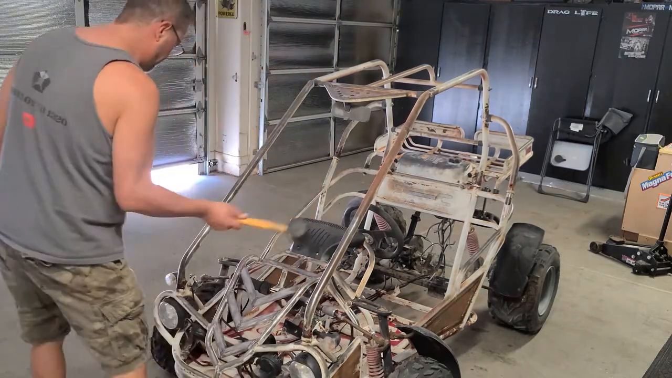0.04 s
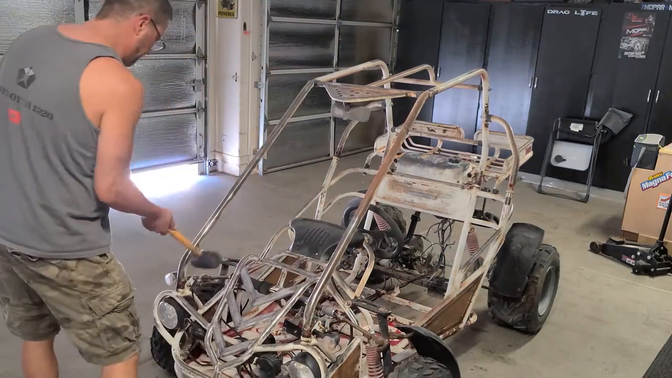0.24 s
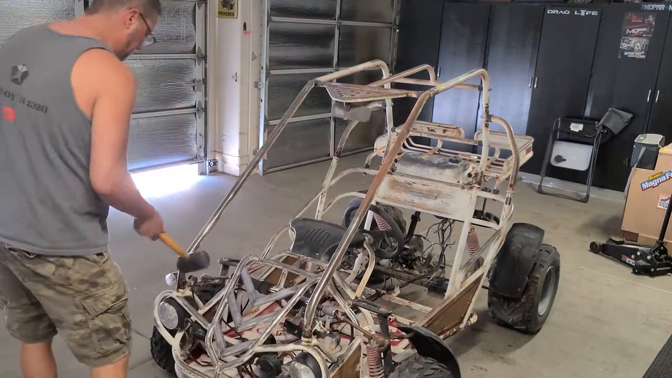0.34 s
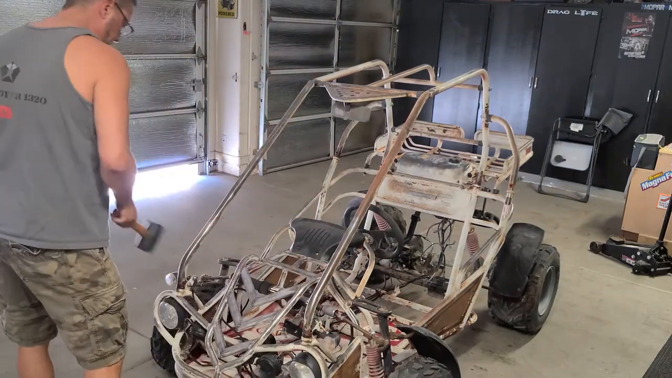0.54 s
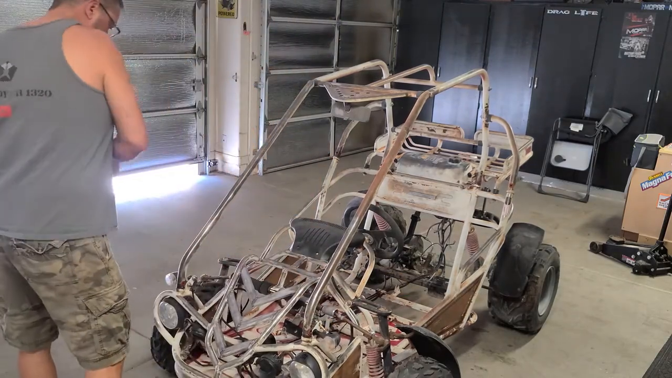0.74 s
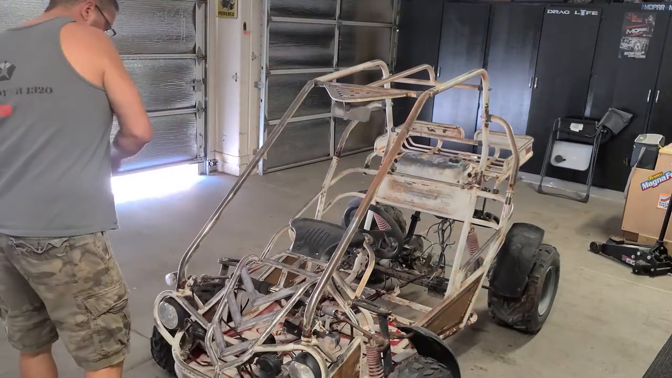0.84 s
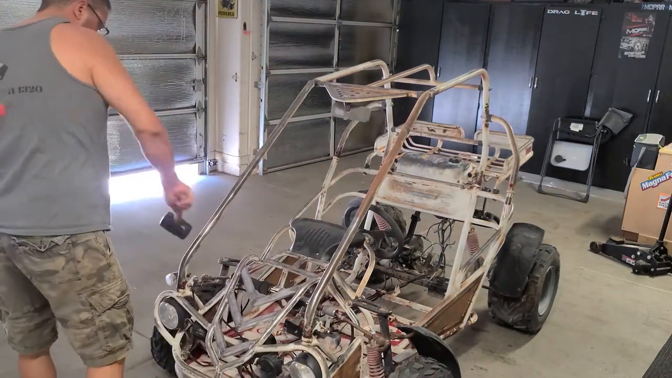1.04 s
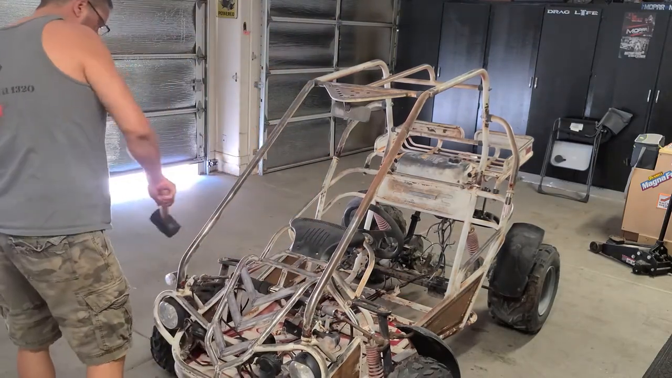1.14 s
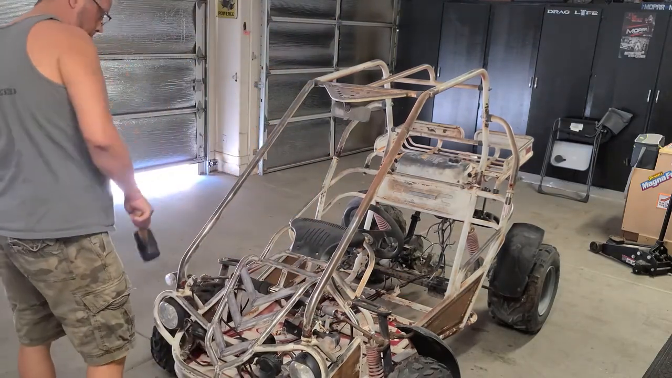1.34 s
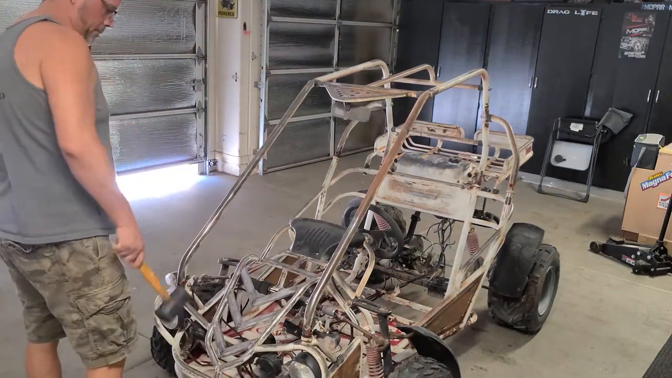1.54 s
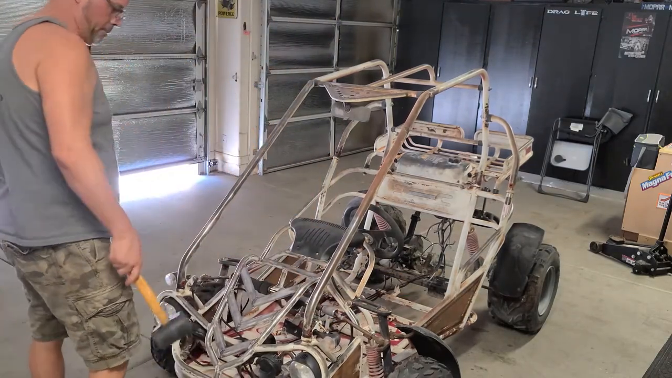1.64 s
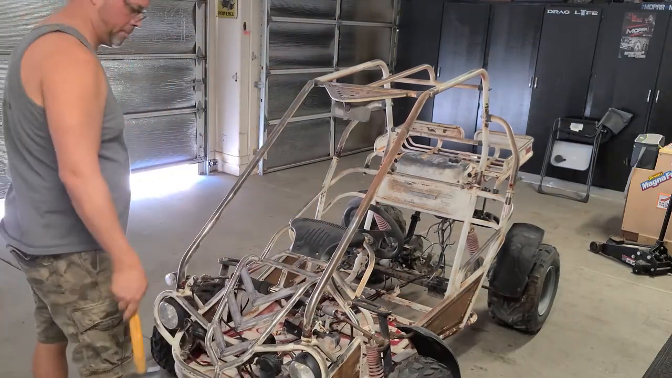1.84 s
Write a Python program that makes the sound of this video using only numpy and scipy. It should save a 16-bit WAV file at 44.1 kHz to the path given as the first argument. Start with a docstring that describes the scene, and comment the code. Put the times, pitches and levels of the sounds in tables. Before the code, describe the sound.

A rubber mallet hits a metal buggy frame, clothing swishing with the swing; the tubes clang, joints rattle and a loose part tinks, then a second blow follows, echoing in a bare garage, the nearby microphone distorting.

```python
"""Two bright slaps ring out in a bare garage as a rubber mallet hits a steel tube frame.
Each blow is a tick, a noise burst, the decaying modes of the tubes and a long hard-walled echo.
Random clicks rattle the joints through resonators, and a loose part tinks as a small set of high modes.
Clothing swishes as swelling filtered noise with the first swing and again near the end.
The garage hums softly as steady coloured noise, and the microphone overloads on the blows."""
import sys
import numpy as np
from scipy import signal
from scipy.fft import rfft, irfft
from scipy.io import wavfile

SR = 44100
rng = np.random.default_rng(int(sys.argv[2]) if len(sys.argv) > 2 else 0)


def invert_db(x):
    """Field ratio 10**(x/20) for x, a level in decibels (scalar or array-like)."""
    u = np.asarray(x, float) / 20
    return 10 ** u


def wav_record(signal):
    """Record a signal, one row per channel, as 16-bit PCM in the file named by sys.argv[1]."""
    frames = np.transpose(np.atleast_2d(signal))
    bounded = np.clip(frames, -1, 1)
    # unit amplitude maps onto the largest positive 16-bit level
    quanta = np.round(bounded * 32767).astype(np.int16)
    wavfile.write(sys.argv[1], SR, quanta)


N = 83790

# mallet blows: start_s, slap_level_db, brightness_db_per_octave, first_tick_level_db
BLOWS = [(0.1983, -6.5, 0.7, -15.5), (1.0349, -6.5, 0.78, -5)]
# resonances of the steel tubes: pitch_hz
TUBE_HZ = [75, 110, 190, 214, 253, 276, 301, 340, 365, 413, 440, 514, 563, 606, 708, 775, 985, 1130, 1216,
           1516, 1627, 1782, 1865, 2040, 2745, 2900]
# correlation of left and right in the blows, echo and cloth: frequency_hz, likeness (-1 to 1)
ROOM_LIKENESS = [(60, 0.69), (180, 0.84), (550, 0.35), (1650, -0.064), (4970, -0.14), (15000, 0.05)]


def rms_one(x):
    """Normalisation: the root-mean-square amplitude becomes 1."""
    return x / np.sqrt(np.mean(x ** 2) + 1e-20)


def at_hz(points, hz):
    """Interpolation on a logarithmic frequency axis, where equal ratios are equal steps."""
    table = np.array(points)
    return np.interp(np.log(hz), np.log(table[:, 0]), table[:, 1])


def coloured(x, spectrum, tilt_db=0):
    """Linear filtering: the spectrum is multiplied by a gain curve, tilted per octave about 1 kHz."""
    hz = np.maximum(np.fft.rfftfreq(x.shape[-1], 1 / SR), 10)
    gain_db = at_hz(spectrum, hz) + tilt_db * np.log2(hz / 1000)
    return irfft(rfft(x) * invert_db(gain_db), x.shape[-1])


def stereo_noise(likeness):
    """Interaural coherence: shares of mid and side noise set the left-right correlation by frequency."""
    hz = np.maximum(np.fft.rfftfreq(N, 1 / SR), 10)
    alike = np.clip(at_hz(likeness, hz), -1, 1)
    mid, side = rfft(rng.standard_normal((2, N)))
    common = np.sqrt(1 + alike) * mid
    opposed = np.sqrt(1 - alike) * side * [[1], [-1]]
    return irfft(common + opposed, N) / np.sqrt(2)


def hum():
    """Stationary broadband noise: the air of the garage, falling slightly in level."""
    # level of the hum: time_s, level_db
    hum_level = [(0, -40), (0.901, -40.5), (1.5, -42), (1.9, -42.5)]
    # spectrum of the hum, relative: frequency_hz, density_db_per_hz
    hum_spectrum = [(15, -20), (30, 7), (45, 0), (63, -5.5), (114, -9), (195, -6), (263, -3), (503, -4),
                    (677, -12.5), (936, -10.5), (1020, -14), (1610, -19), (1790, -15), (2280, -24),
                    (2550, -25), (8000, -51), (12500, -65), (13200, -52.5), (14000, -67.5), (16000, -64.5)]
    # correlation of left and right: frequency_hz, likeness (-1 to 1)
    hum_likeness = [(60, 0.89), (180, 0.98), (550, 0.67), (1650, 0.059), (4970, -0.069), (15000, 0.44)]
    time_s, level_db = np.transpose(hum_level)
    envelope = invert_db(np.interp(np.arange(N) / SR, time_s, level_db))
    return envelope * rms_one(coloured(stereo_noise(hum_likeness), hum_spectrum))


def swishes():
    """Friction noise: cloth brushing on cloth gives bright noise in short bell-shaped swells."""
    # clothing swishes: crest_s, level_db, rise_s, fall_s (rise and fall to 1/e)
    cloth_swells = [(0.083, -50.5, 0.028, 0.13), (0.187, -42.5, 0.0206, 0.066), (1.851, -59, 0.016, 0.028)]
    # spectrum of the cloth, relative: frequency_hz, density_db_per_hz
    cloth_spectrum = [(1200, -4), (2500, -3.5), (5000, -10), (9000, -14.5), (15500, -23)]
    t = np.arange(N) / SR
    envelope = 0
    for crest_s, level_db, rise_s, fall_s in cloth_swells:
        width_s = np.where(t < crest_s, rise_s, fall_s)
        envelope = envelope + invert_db(level_db) * np.exp(-((t - crest_s) / width_s) ** 2)
    return envelope * rms_one(coloured(stereo_noise(ROOM_LIKENESS), cloth_spectrum))


def ticks():
    """Impulsive contact: the first touch of the head is an abrupt, exponentially fading bright noise."""
    # spectrum of the tick, relative: frequency_hz, density_db_per_hz
    tick_spectrum = [(3000, -30), (5500, 1), (8000, 1), (12000, -6.5), (16000, -11.5)]
    fade_s = 0.00074  # to 1/e
    t = np.arange(N) / SR
    envelope = 0
    for start_s, _, _, tick_db in BLOWS:
        since = np.maximum(t - start_s, 0)
        envelope = envelope + invert_db(tick_db) * (t > start_s) * np.exp(-since / fade_s)
    return envelope * rms_one(coloured(stereo_noise(ROOM_LIKENESS), tick_spectrum))


def slap():
    """Contact chatter: head and frame give a noise burst that rises and soon fades."""
    # spectrum of the direct slap, relative: frequency_hz, density_db_per_hz
    near_spectrum = [(100, -62), (300, -27), (700, -10.5), (1300, -10.5), (2800, -18), (4500, -27),
                     (8000, -25), (16000, -32)]
    rise_s, fade_start_s, fade_s = 0.0082, 0.0047, 0.0064  # the fade begins within the rise
    out = 0
    for start_s, slap_db, tilt_db, _ in BLOWS:
        t = np.maximum(np.arange(N) / SR - start_s, 0)
        envelope = np.minimum(t / rise_s, 1) * np.exp(-np.maximum(t - fade_start_s, 0) / fade_s)
        burst = rms_one(coloured(stereo_noise(ROOM_LIKENESS), near_spectrum, tilt_db))
        out = out + invert_db(slap_db) * envelope * burst
    return out


def struck(modes, start_s, spread_db, detune, split, twin_db):
    """Modal superposition: one hit excites damped sines, each beating with a close twin mode."""
    swing_up_cycles = 3.05  # periods for a mode to grow to 1 - 1/e
    t = np.maximum(np.arange(N) / SR - start_s, 0)
    draws = rng.standard_normal((len(modes), 3))
    out = 0
    for (hz, level_db, t60_s), (strength, pitch, twin) in zip(modes, draws):
        phase = 2 * np.pi * hz * (1 + detune * pitch) * t
        # the sign term moves the twin away from the same pitch
        twin_ratio = 1 + split * np.sin(twin + np.sign(twin) / 2)
        pair = np.sin(phase) + invert_db(twin_db) * np.sin(phase * twin_ratio)
        decay = invert_db(level_db + spread_db * strength - 60 * t / t60_s)
        out = out + decay * pair * (1 - np.exp(-t * hz / swing_up_cycles))
    return out


def tubes():
    """Forced onset of modes: the soft head lets the tubes swing up over the contact time."""
    # one row per tube mode: level_db at the first blow, level_db at the second blow, t60_s
    tube_modes = [(-24, -20.5, 0.1), (-19, -27, 0.15), (-19, -18.5, 0.33), (-16, -21.5, 0.77),
                  (-21, -19.5, 0.5), (-14, -16.5, 0.63), (-14.5, -17, .3), (-39, -17, 1),
                  (-38.5, -17, 0.78), (-12, -9.5, 0.7), (-17.5, -23, 0.45), (-23.5, -25, .4),
                  (-4, -9.5, 0.37), (-12.5, -15, 0.51), (-13.5, -16.5, 0.37), (-19, -25.5, 0.26),
                  (-28, -19.5, 0.45), (-20, -27, 0.36), (-13, -12.5, 0.11), (-10.5, -33.5, 0.066),
                  (-46.5, -20, 0.1), (-15.5, -21.5, 0.25), (-31, -23, 0.35), (-30.5, -23.5, 0.25),
                  (-22, -33.5, 0.26), (-35, -32, 0.64)]
    contact_s = 0.00053
    t = np.arange(N) / SR
    out = 0
    for blow, (start_s, *_) in enumerate(BLOWS):
        modes = np.c_[TUBE_HZ, np.array(tube_modes)[:, [blow, -1]]]
        ring = struck(modes, start_s, spread_db=1.5, detune=.004, split=.026, twin_db=-4)
        out = out + ring * (1 - np.exp(-np.maximum(t - start_s, 0) / contact_s))
    return out


def ring_at(clicks, hz, t60_s):
    """Two-pole resonance: a unit click sets a decaying sine of height 1 ringing."""
    radius, angle = invert_db(-60 / (t60_s * SR)), 2 * np.pi * hz / SR
    numerator = [0, np.sin(angle)]
    denominator = [1, -2 * radius * np.cos(angle), radius * radius]
    return signal.lfilter(numerator, denominator, clicks + 1e-18)  # offset avoids denormals


def joints():
    """Random impact excitation: a dying rattle in the joints stirs the middle modes unevenly."""
    rattle_db, rattle_t60_s, ring_t60_s = -29.5, 0.28, 0.067
    clicks_per_s, spread_db = 150, 4  # for each mode
    from_hz, to_hz = 700, 2100
    t, out = np.arange(N) / SR, 0
    shaking = 0
    for start_s, *_ in BLOWS:
        since = np.maximum(t - start_s, 0)
        shaking = shaking + (t > start_s) * invert_db(rattle_db - 60 * since / rattle_t60_s)
    for hz in TUBE_HZ:
        if from_hz < hz < to_hz:
            happens = rng.random(N) < clicks_per_s / SR
            size = invert_db(spread_db * rng.standard_normal(N)) * rng.choice([-1, 1], N)
            out = out + ring_at(happens * size * shaking, hz, ring_t60_s)
    return out


def slap_to_walls():
    """Impulse excitation: seen from the walls, each slap is one short coloured push."""
    # spectrum sent to the walls, relative: frequency_hz, density_db_per_hz
    wall_spectrum = [(35, -58), (60, -57.5), (262, -10), (579, -10.5), (803, -15.5), (1250, -14.5),
                     (1410, -18), (1740, -16.5), (3340, -30), (6000, -31.5), (16000, -48)]
    first_wall_s = .004  # delay after the blow
    out = 0
    for start_s, slap_db, tilt_db, _ in BLOWS:
        click = 1. * (np.arange(N) == int((start_s + first_wall_s) * SR))
        push = coloured(click, wall_spectrum, tilt_db)
        out = out + invert_db(slap_db) * push / np.sqrt(np.sum(push ** 2))
    return out


def garage(x):
    """Reverberation by convolution: dense echoes build up and die by band, lows building up more slowly."""
    # decay time of the garage: frequency_hz, t60_s
    garage_decay = [(60, 0.13), (160, 0.76), (420, 0.82), (1100, 0.87), (2900, 0.65), (5500, 0.52),
                    (8500, 0.39), (12000, 0.31), (16000, .25)]
    # gain of the echo by band: frequency_hz, level_db
    garage_colour = [(60, 10.5), (150, 11.5), (400, 1), (1000, 1.5), (2000, -1.5), (2900, 0), (4200, -4),
                     (6000, -3.5), (9000, -2), (13000, 2), (16000, -3)]
    build_up_s, build_up_cycles = 0.013, 2.3  # time constant: fixed part plus periods of the band
    band_edges_hz = 25 * 2 ** np.arange(0, 9.6, 1 / 3)  # third octaves
    t = np.arange(N) / SR
    white = [stereo_noise(ROOM_LIKENESS) for _ in range(2)]  # neighbouring bands use separate noises
    response = 0
    for k, (low, high) in enumerate(zip(band_edges_hz, band_edges_hz[1:])):
        hz = np.sqrt(low * high)
        growth = 1 - np.exp(-t / (build_up_s + build_up_cycles / hz))
        envelope = growth * invert_db(-60 * t / at_hz(garage_decay, hz))
        band_filter = signal.butter(2, [low, high], "band", fs=SR, output="sos")
        band = signal.sosfilt(band_filter, white[k % 2])
        response = response + invert_db(at_hz(garage_colour, hz)) * band * envelope / np.sqrt(np.sum(envelope ** 2))
    return signal.fftconvolve(x, response, axes=1)[:, :N]


def tinks():
    """Modal ringing of a small body: a loose part tinks at high, fixed pitches with faint close twins."""
    # tinks: start_s, level_db
    tink_hits = [(0.25, -55), (0.369, -43), (1.05, -46), (1.125, -51), (1.207, -43)]
    # modes of the loose part: pitch_hz, level_db, t60_s
    loose_modes = [(5585, -15, .45), (5640, -10, .06), (5895, -3, .4), (5960, -17, .15), (6748, -20, .3),
                   (8727, -23, .3)]
    out = 0
    for start_s, level_db in tink_hits:
        hit = struck(loose_modes, start_s, spread_db=1.5, detune=0, split=.0015, twin_db=-12)
        out = out + invert_db(level_db) * hit
    return out


def scene():
    """Superposition: direct sounds and their echo add, with swishes and hum beside them."""
    left_db = 0.53  # left raised and right lowered by this much
    tubes_echo_db, slap_echo_db, tink_echo_db = -7, 30.5, -11  # sends to the garage
    ring = tubes() + joints()
    tink = tinks()
    sent = invert_db(tubes_echo_db) * ring + invert_db(slap_echo_db) * slap_to_walls() + invert_db(tink_echo_db) * tink
    struck_sounds = ring + ticks() + slap() + tink + garage(sent[None])
    return struck_sounds * invert_db([[left_db], [-left_db]]) + swishes() + hum()


def top_cut(x):
    """Nothing passes above the cut-off."""
    return signal.sosfilt(signal.butter(12, 16350, fs=SR, output="sos"), x)


def record(dry):
    """Band limiting and saturation: bass is thinned, the top is cut, peaks are squashed and clip."""
    bass_cut_hz, top_cut_hz, overload = 55, 16000, 2.5  # overload: limit of the soft squash, clip at 1
    x = signal.sosfilt(signal.butter(2, bass_cut_hz, "high", fs=SR, output="sos"), dry)
    x = signal.sosfilt(signal.cheby2(12, 30, top_cut_hz, fs=SR, output="sos"), x)
    squashed = overload * np.tanh(x / overload)
    mix = np.clip(squashed, -1, 1)
    return top_cut(mix)


dry = scene()
out = record(dry)
wav_record(out)
```